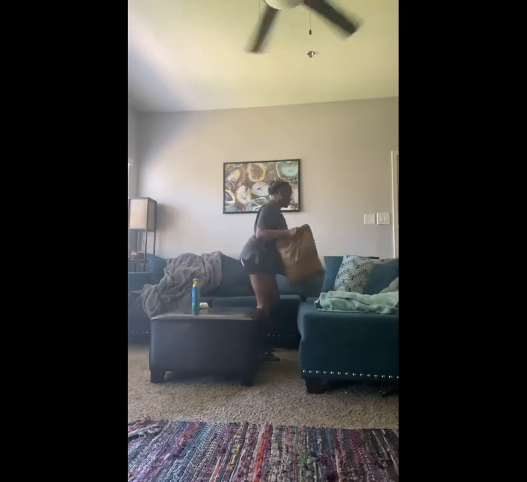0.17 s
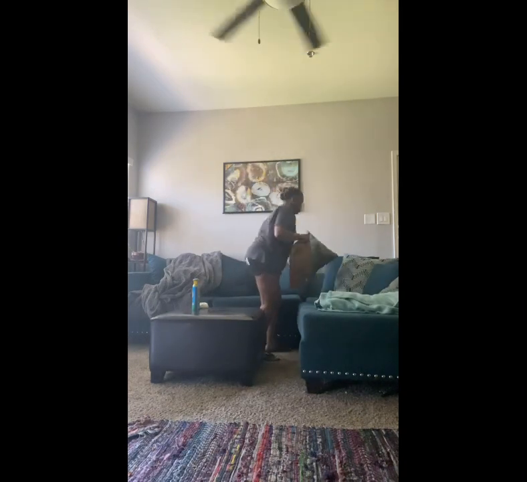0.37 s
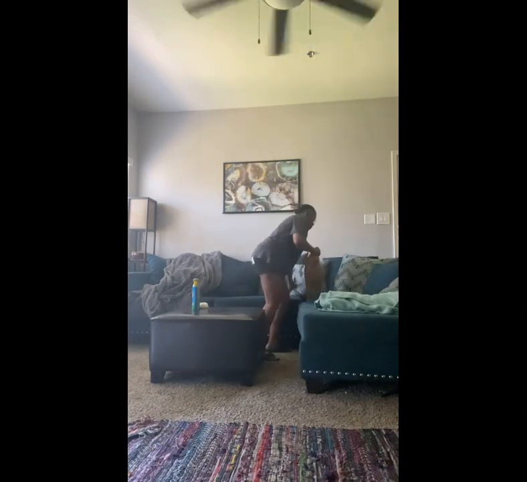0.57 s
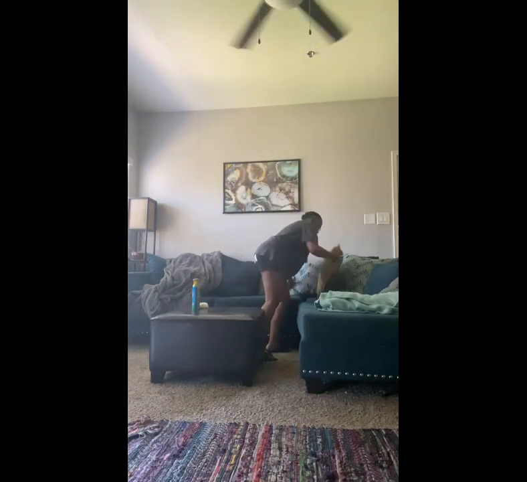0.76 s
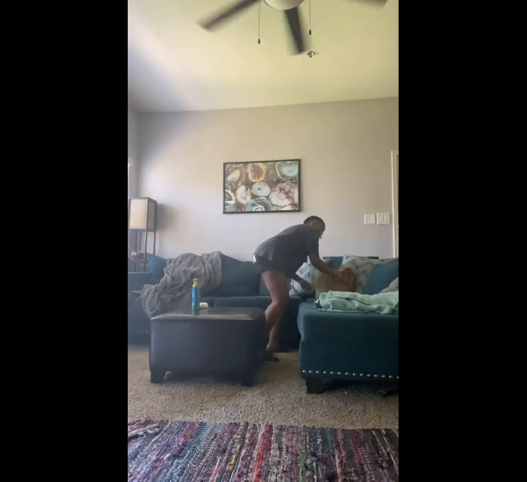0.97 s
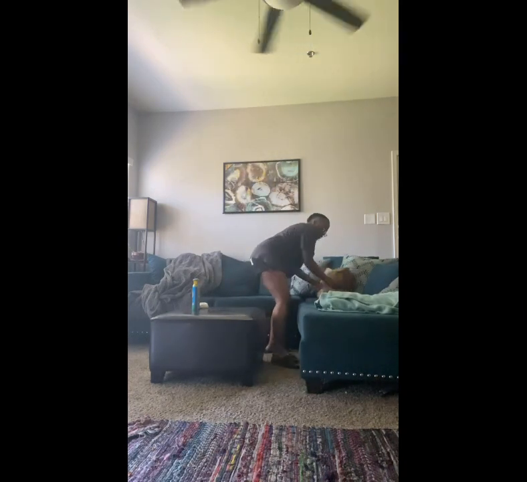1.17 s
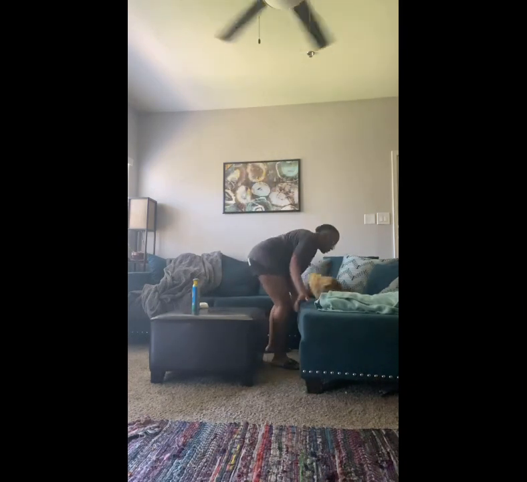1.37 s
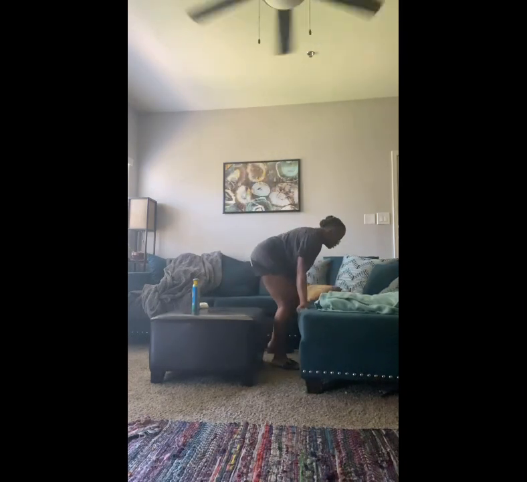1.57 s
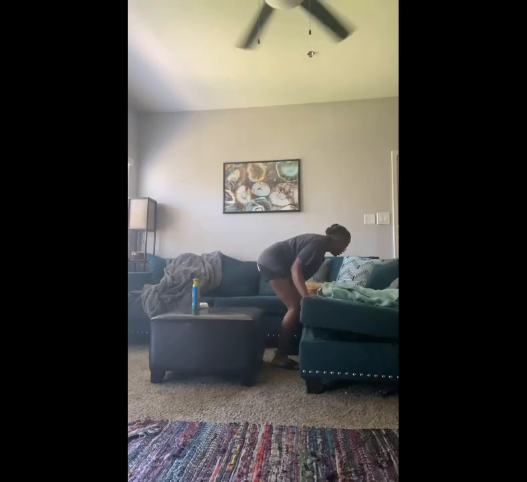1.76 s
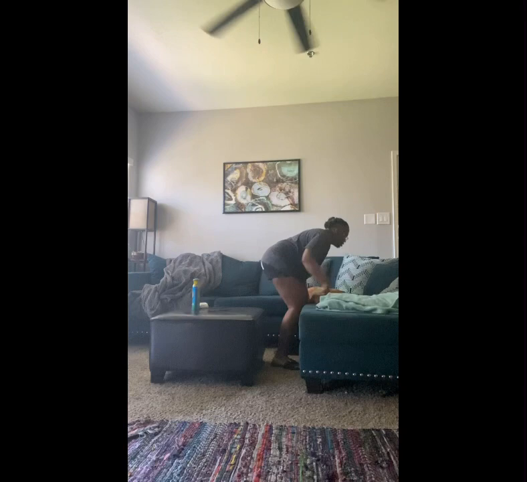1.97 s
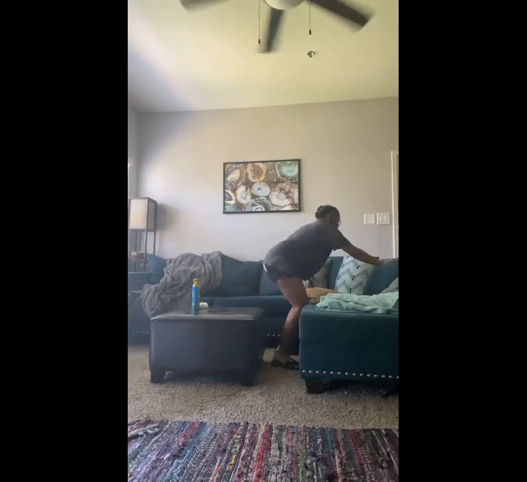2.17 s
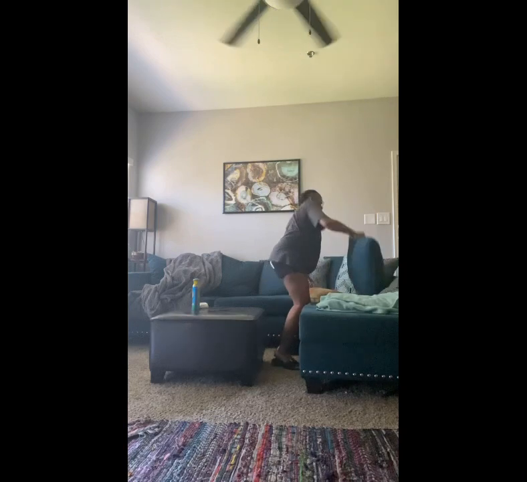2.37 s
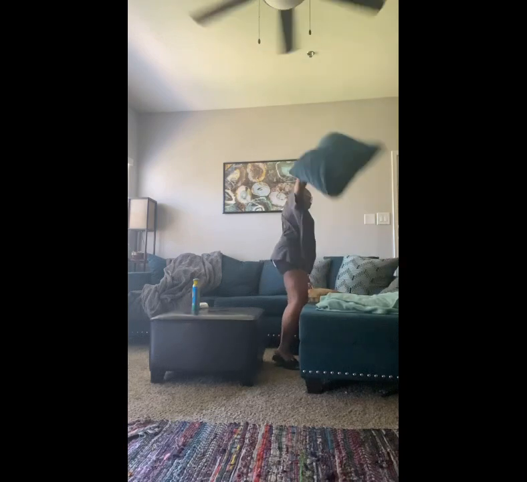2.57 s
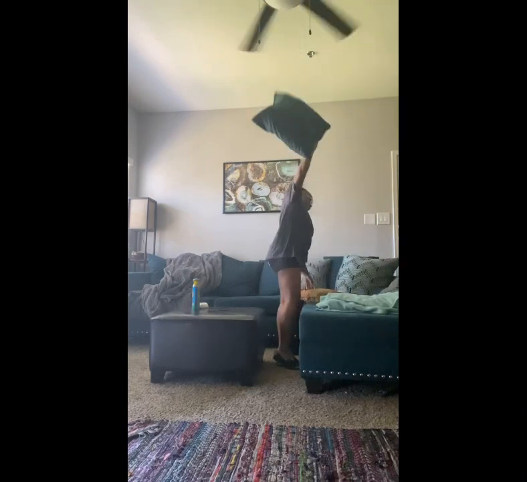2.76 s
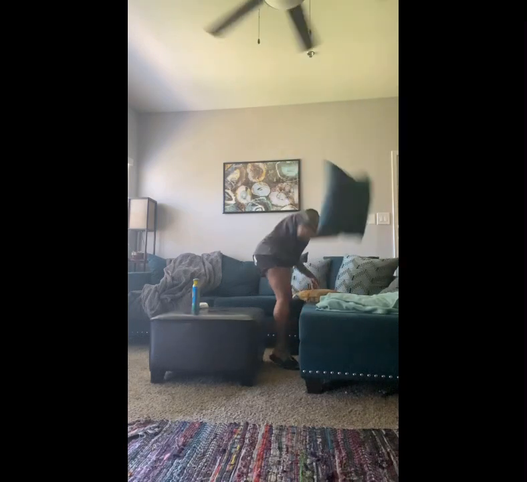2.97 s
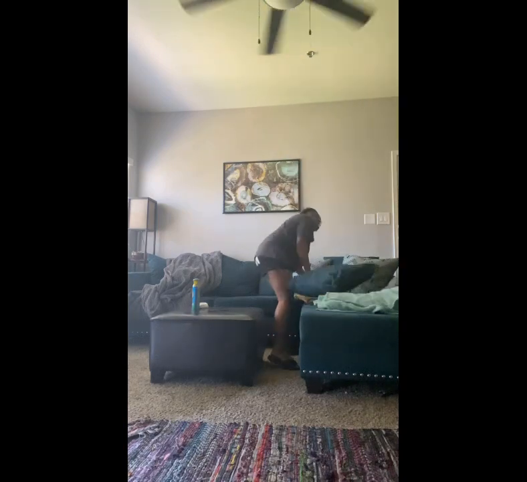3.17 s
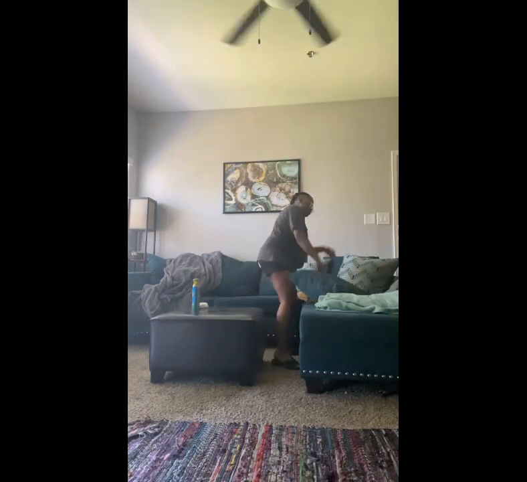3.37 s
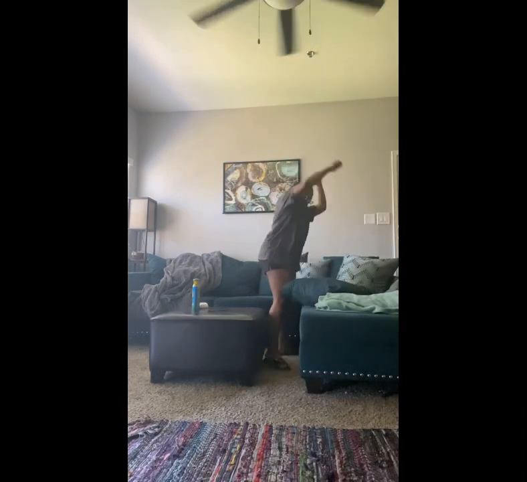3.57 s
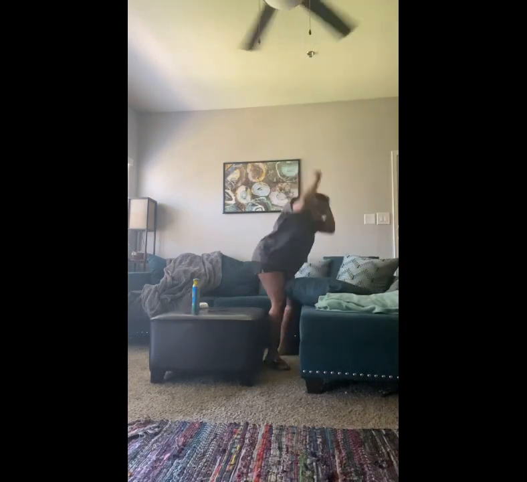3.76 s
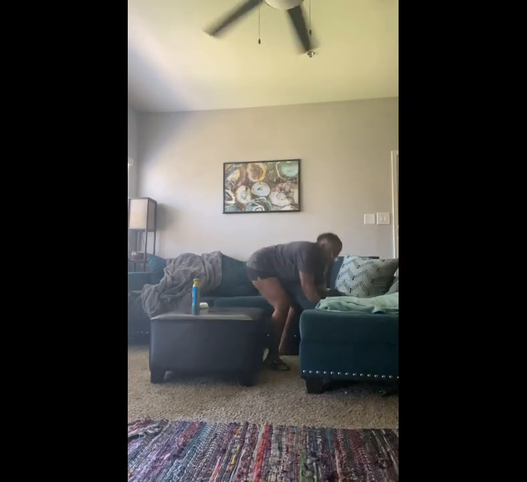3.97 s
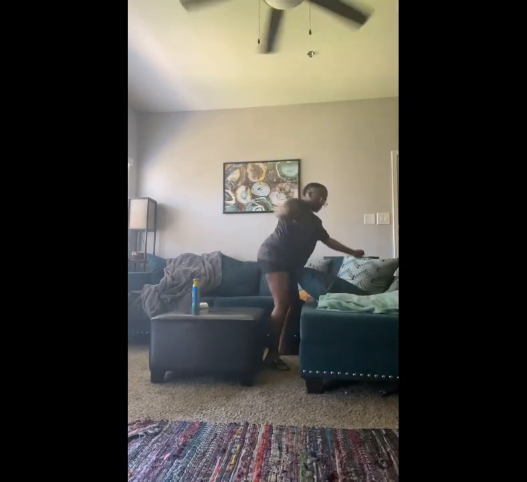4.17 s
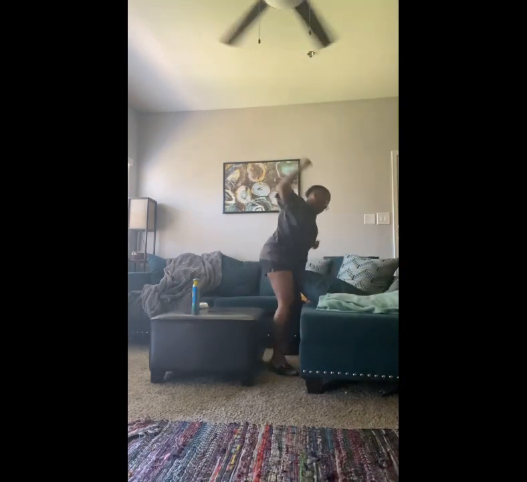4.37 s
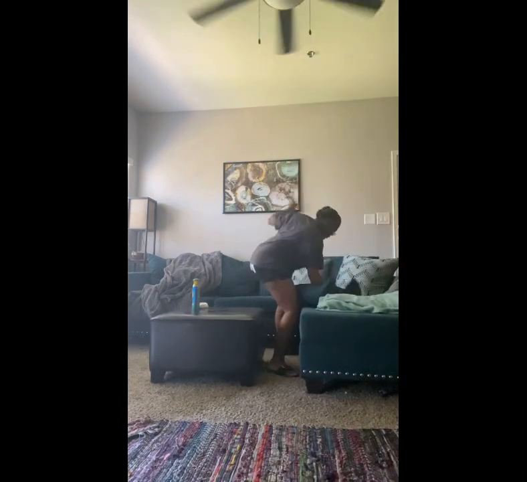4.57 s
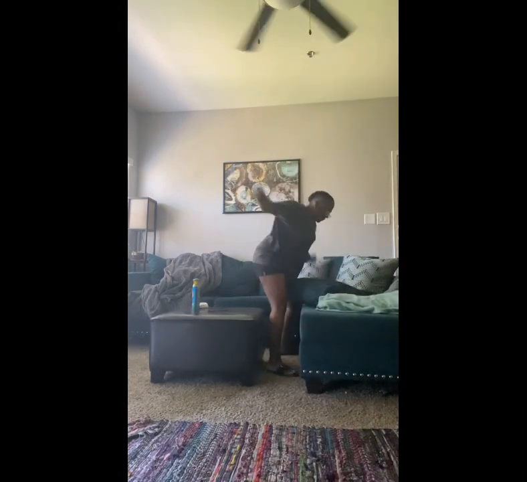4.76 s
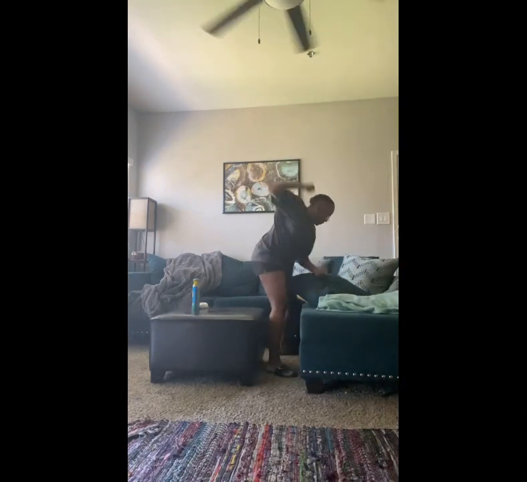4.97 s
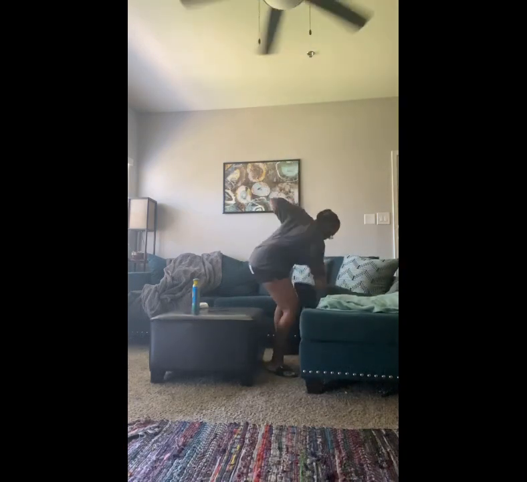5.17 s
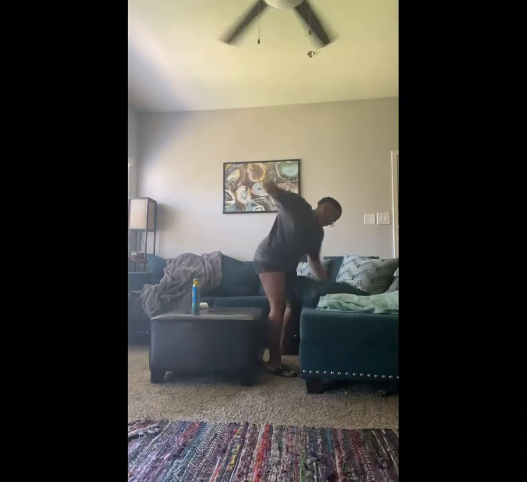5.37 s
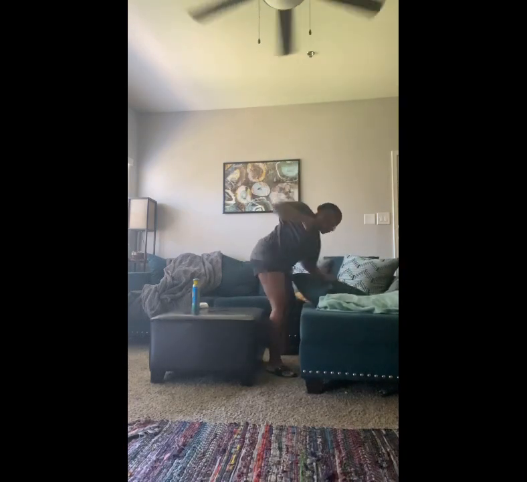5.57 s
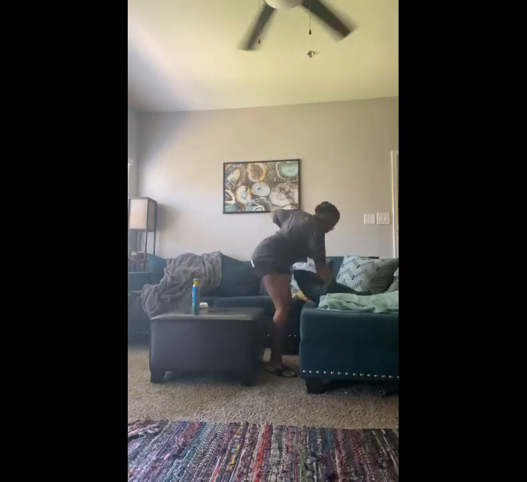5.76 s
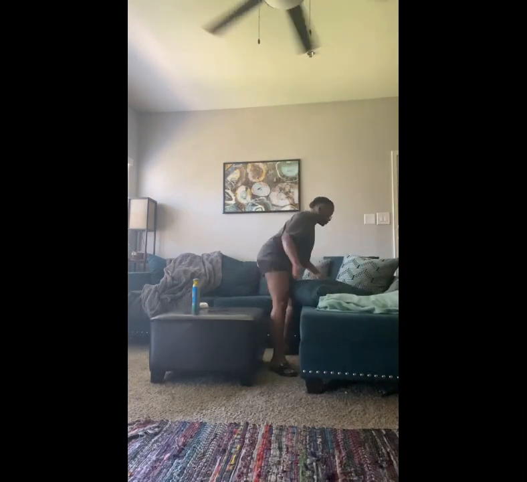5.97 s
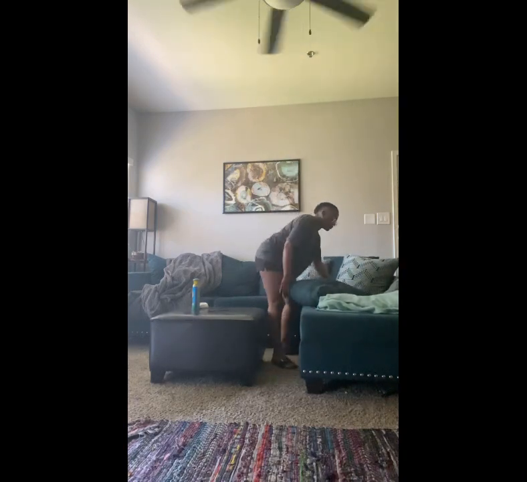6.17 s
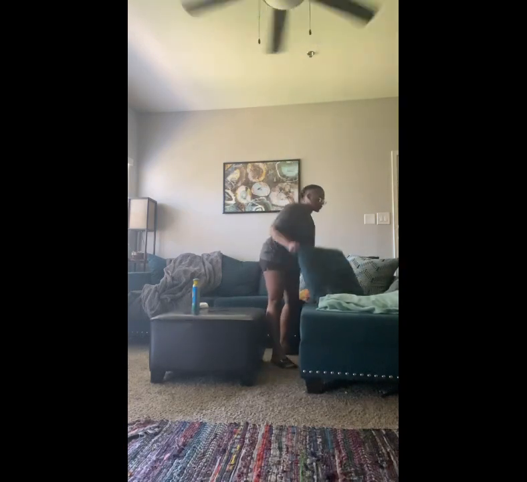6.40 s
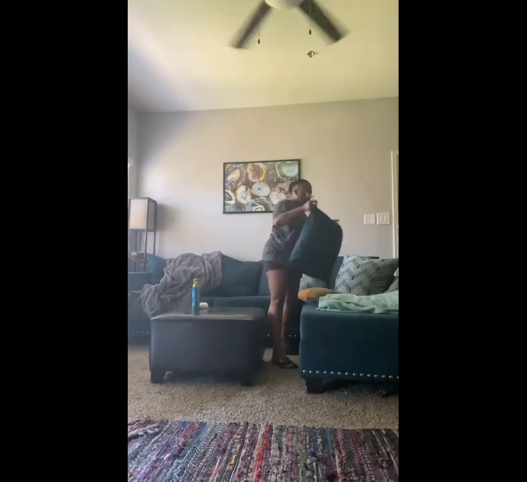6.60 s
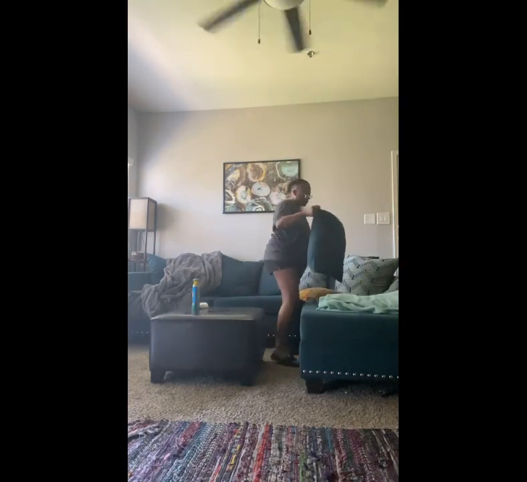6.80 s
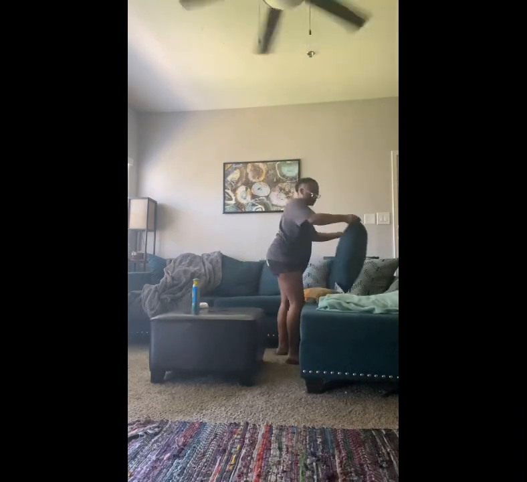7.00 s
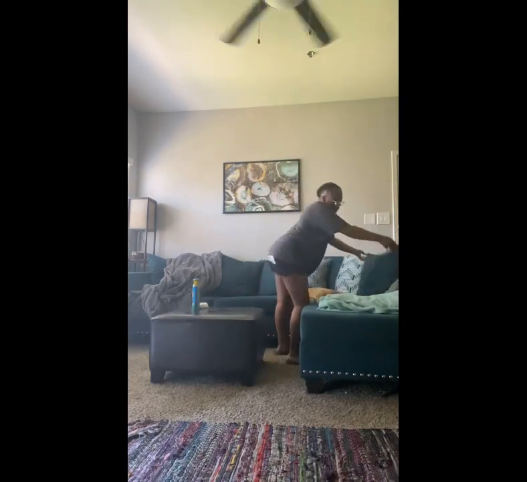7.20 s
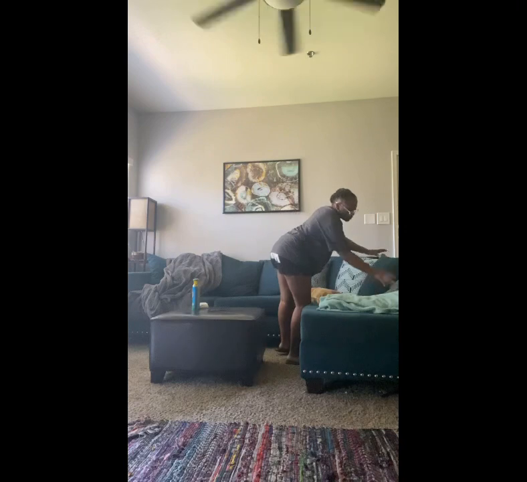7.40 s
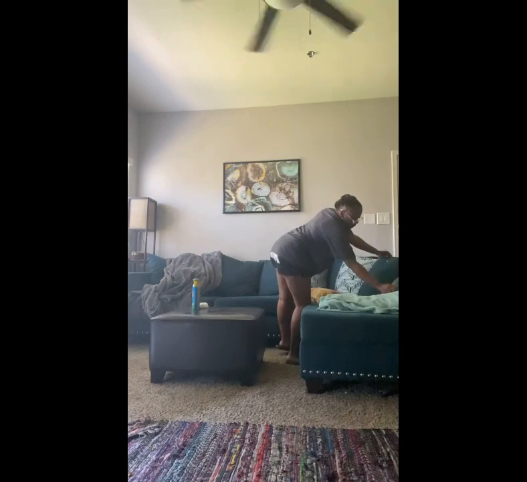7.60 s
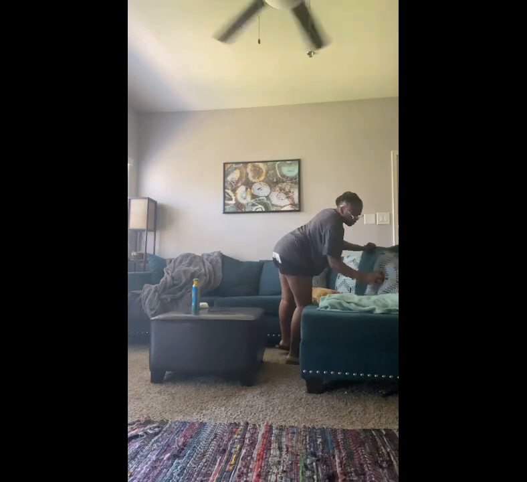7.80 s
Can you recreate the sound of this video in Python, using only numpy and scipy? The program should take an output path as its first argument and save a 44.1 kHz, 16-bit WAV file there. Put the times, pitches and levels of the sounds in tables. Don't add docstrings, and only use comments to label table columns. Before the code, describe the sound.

A carpeted living room heard close up in stereo, with soft room air and a very quiet low fan hum throughout. From 0 to 1.7 s cloth is shuffled, with light pats and short faint swishes. At 1.8 s a cushion drops flat and dull. From 2 to 4.2 s a tiny metal charm tinkles very high and thin, brightest around 2.8 to 3.0 s, amid crisp fabric brushing. The hardest punch lands at 3.0 s, a deep whump with a cloth slap and short room ring. Another hard one follows at 3.85, then 4.5, a softer one at 4.8, a sharp pair near 5.1, light at 5.35 and medium at 5.65. Rustling and a silky swish follow near 5.9, a soft drop at 6.55 with little pats and a faint floor thud, then gentle cloth handling until about 7.9 s.

```python
import sys
import numpy as np
from scipy import signal
from scipy.fft import rfft, irfft
from scipy.io import wavfile

SR = 44100
rng = np.random.default_rng(int(sys.argv[2]) if len(sys.argv) > 2 else 0)


def gain_from_db(level_db):
    decades = np.asarray(level_db, float) / 20
    return 10 ** decades


def waveform_to_disk(signal):
    frames = np.transpose(np.atleast_2d(signal))
    scaled = np.clip(frames, -1, 1) * 32767
    samples = np.round(scaled).astype(np.int16)
    wavfile.write(sys.argv[1], SR, samples)


N = 345744
TIME_S = np.arange(N) / SR


def at_hz(points, hz):
    curve_hz, value = np.transpose(points)
    return np.interp(np.log(hz), np.log(curve_hz), value)


def shares(centres_hz, hz):
    rank = np.argsort(centres_hz)
    log_centres = np.log(np.sort(centres_hz))
    return np.array([np.interp(np.log(hz), log_centres, rank == k) for k in range(len(rank))])


def drift(rate_hz):
    r = np.exp(-80 * np.pi * rate_hz / SR)
    slow = signal.lfilter([1], [1, -2 * r, r * r], rng.standard_normal(N // 40 + 2002))[2000:]
    return np.interp(np.arange(N) / 40, np.arange(len(slow)), slow / slow.std())


def clicks(times_s, sizes):
    index = np.round(np.asarray(times_s) * SR).astype(int)
    return np.bincount(index, sizes, N)[:N] + 1e-18


def fade(x, t60_s):
    return signal.lfilter([1], [1, -gain_from_db(-60 / (t60_s * SR))], x)


def ring(x, hz, t60_s):
    r, w = gain_from_db(-60 / (t60_s * SR)), 2 * np.pi * hz / SR
    return signal.lfilter([0, np.sin(w)], [1, -2 * r * np.cos(w), r * r], x)


def banded(envelope, mid, side, side_db, grain_db, pulse=lambda hz: 0):
    white = rng.standard_normal((2, 2, N)) * gain_from_db(grain_db * rng.standard_normal(N))
    white /= white.std()
    edges_hz = 32 * 2 ** (np.arange(28) / 3)
    total = np.sqrt(np.trapezoid(gain_from_db(2 * at_hz(mid, edges_hz)), edges_hz) * 2 / SR)
    out = np.zeros((2, N))
    for k, (low_hz, high_hz) in enumerate(zip(edges_hz, edges_hz[1:])):
        hz = np.sqrt(low_hz * high_hz)
        colour = gain_from_db(np.array([[at_hz(mid, hz)], [at_hz(side, hz) + side_db]])) / total
        band = signal.butter(2, [low_hz, high_hz], "band", fs=SR, output="sos")
        out += colour * signal.sosfilt(band, white[k % 2] * envelope(hz) + pulse(hz))
    return out


# centre_hz, width_hz
FAN_MODES = [(103, 12), (180, 3), (288, 6)]
FAN_RMS_DB = [-58, -63, -73]


def fan():
    out = np.zeros(N)
    for (hz, width_hz), rms_db in zip(FAN_MODES, FAN_RMS_DB):
        hum = ring(rng.standard_normal(N), hz, np.log(1000) / (np.pi * width_hz))
        out += gain_from_db(rms_db) * hum / hum.std()
    return out * [[1], [.03]]


# middle_s, half_length_s, strength_db (over room air), brightness_db
HANDLING = [(0.0, 0.19, 12.5, -2), (0.47, 0.15, 3.5, 7.5), (0.88, 0.53, 2.5, 1.5), (1.527, 0.31, 6.5, 4.5),
            (1.82, 0.31, 4.5, 6), (2.24, 0.21, 6, 1), (2.53, 0.54, 1.5, 4.5), (2.8, 0.18, 4, 4),
            (3.014, 0.095, 8, 8.5), (3.138, 0.13, 4, 6.5), (3.31, 0.24, 7, 6.5), (3.563, 0.23, 3, 6.5),
            (4.017, 0.15, 10.5, 5.5), (4.153, 0.16, 5.5, 2.5), (4.436, 0.15, 3.5, 6.5),
            (4.835, 0.47, 3.5, 4), (5.168, 0.18, 5, 11), (5.41, 0.14, 12, 1.5), (5.681, 0.21, 6, 7),
            (6.049, 0.34, 6, 5.5), (6.34, 0.29, 5, 1), (6.57, 0.3, 5.5, 5.5), (6.412, .05, 2.5, 10.5),
            (6.98, 0.17, 0.5, 4.5), (7.19, 0.13, 7, 2.5), (7.558, 0.18, 8.5, -0.5), (7.83, 0.24, 8, -0.5)]
# time_s, share
HISS_SHARE = [(0, .1), (1.4, 0.15), (1.55, 1.63), (3.7, 1.2), (6.65, 1.7), (6.9, .3), (7.84, 0.39)]
RESTING_DB = [3, 3, 4.5]


def handling():
    power = np.ones((2, N))
    for middle_s, half_s, strength_db, bright_db in HANDLING:
        arch = np.clip(1 - ((TIME_S - middle_s) / half_s) ** 2, 0, 1) ** 2
        peak_db = np.clip([[strength_db], [strength_db + bright_db]], 0, 40)
        power += (gain_from_db(2 * peak_db) - 1) * arch ** 2
    shuffle_db, brushing_db = 10 * np.log10(power)
    hiss_db = np.interp(TIME_S, *np.transpose(HISS_SHARE)) * brushing_db
    return np.array([shuffle_db, brushing_db, hiss_db]) + np.array(RESTING_DB)[:, None]


RUSTLE_HZ = [500, 3200, 11000]
# freq_hz, density_db_per_hz
AIR_MID = [(30, -6.5), (75, -6), (110, 3), (150, -35.5), (210, -21.5), (400, -18.5), (740, -26.5),
           (1900, -47.5), (3200, -44.5), (5200, -50), (7000, -50.5), (12000, -69), (16000, -68.5)]
# freq_hz, density_db_per_hz
AIR_SIDE = [(30, -22.5), (184, -5.5), (480, -3.5), (820, -7.5), (1130, -7.5), (2500, -18.5), (3200, -11),
            (5000, -18.5), (8000, -27.5), (12000, -36.5), (16000, -49.5)]


def rustle():
    air_db, side_db, crease_db = -59, -29.5, 1
    together = drift(1.4)
    rise_db = handling() * (1 + crease_db / 10 * drift(22))

    def envelope(hz):
        handled_db = np.clip(np.log2(hz / 110), 0, 1) * (shares(RUSTLE_HZ, hz) @ rise_db)
        patchy_db = (1.6 * together + 1.8 * drift(14)) * min(hz / 300, 1)
        return gain_from_db(air_db + handled_db + patchy_db)

    return banded(envelope, AIR_MID, AIR_SIDE, side_db, grain_db=1.5)


# start_s, length_s, first_pitch_hz, last_pitch_hz, level_db
SWISHES = [
    (0.261, 0.077, 2890, 2930, -60),
    (0.876, 0.1, 2890, 3400, -68),
    (1.874, 0.14, 3150, 3240, -61),
    (3.137, 0.16, 3100, 3500, -67),
    (3.273, 0.11, 3460, 3496, -57.5),
    (3.515, .13, 3110, 3000, -63),
    (4.0, 0.25, 3380, 3280, -66),
    (4.333, 0.16, 3310, 3510, -60),
    (5.913, 0.18, 3343, 3230, -58),
    (7.746, 0.17, 3170, 3230, -68),
]


def swish():
    edge_s = 0.047
    out = np.zeros(N)
    lowpass = signal.butter(2, 170, fs=SR, output="sos")
    narrow = signal.sosfilt(lowpass, rng.standard_normal((2, N)))
    narrow /= narrow.std()
    waver_hz, waver_db = 40.5 * drift(19), 3.5 * drift(3.3)
    for start_s, length_s, first_hz, last_hz, level_db in SWISHES:
        end_s = start_s + length_s
        stroke = np.clip(np.minimum(TIME_S - start_s, end_s - TIME_S) / edge_s, 0, 1)
        pitch_hz = np.interp(TIME_S, [start_s, end_s], [first_hz, last_hz]) + waver_hz
        phase = 2 * np.pi * np.cumsum(pitch_hz) / SR
        sung = narrow[0] * np.cos(phase) + narrow[1] * np.sin(phase)
        out += stroke * gain_from_db(level_db + waver_db - 9.5) * sung
    return out * [[1], [.3]]


# start_s, high_ring_db, low_ring_db
TINKLES = [(1.9796, -40.5, -60.5), (1.9961, -51, -79), (2.2425, -46, -68), (2.2954, -52, -70),
           (2.7075, -49.5, -77), (2.7329, -44.5, -61.5), (2.768, -31, -53), (2.7924, -51.5, -62),
           (2.8821, -44, -59.5), (2.91, -35, -54.5), (3.0243, -26.5, -49.5), (3.0732, -44, -64),
           (3.1874, -55, -70), (3.3376, -62, -60.5), (3.3966, -37, -56), (3.4773, -72, -72),
           (3.708, -54.5, -70.5), (3.7385, -52, -62.5), (3.7703, -71, -83), (3.8431, -48.5, -52.5),
           (3.866, -46.5, -66), (3.9294, -56, -62), (3.9746, -70, -91), (4.2004, -54.5, -68.5)]
# first_s, last_s
SWAY_S = (2.0, 4.2)
# high_ring_db, low_ring_db
SWAY_DB = (-68, -80.5)
CHARM_HZ = [15470, 15545, 15630, 15390, 12720, 5710, 6100, 5050]
# mode_db, t60_s, side_db
CHARM_MODES = [(-10, .15, -30), (-11, .13, -30), (-15, .1, -30), (-16, .1, -30), (-33, .1, -3), (-5, .1, 2),
               (-9, .06, 2), (2, .22, 0)]
# freq_hz, density_db_per_hz
RATTLE_MID = [(3000, -29.5), (5500, -0.5), (8000, 6), (12000, -3), (16000, -0.5)]
# freq_hz, density_db_per_hz
RATTLE_SIDE = [(3000, -19.5), (5500, 0.5), (9000, -1), (12000, -6), (16000, -7)]


def charm():
    sway = rng.random((40, 2))
    sway_place = (np.arange(len(sway)) + sway[:, 0]) / len(sway)
    sway_s = np.interp(sway_place, [0, 1], SWAY_S)
    faint = np.c_[sway_s, np.add(SWAY_DB, 12.0 * (sway[:, 1:] - .5))]
    start_s, high_db, low_db = np.vstack([TINKLES, faint]).T
    rattle_db = -10 + 0.55 * high_db + 0.48 * low_db

    luck = rng.random((len(start_s), 80))
    touch_s = start_s[:, None] + .025 * luck[:, :4] ** 2 * [0, 1, 1, 1]
    walls = rng.standard_normal((2, 9000)) * gain_from_db(-28.0 - 60 * np.arange(9000) / (.16 * SR))
    walls[:, 0] = 1
    rings = np.zeros((2, N))
    for k, (hz, (mode_db, t60_s, side_db)) in enumerate(zip(CHARM_HZ, CHARM_MODES)):
        ring_db = high_db + 0.6 if hz > 8000 else low_db - 3.0
        for ch in range(2):
            first = 4 + 8 * k + 4 * ch
            draw = luck[:, first:first + 4]
            strike = np.sign(draw - .5) * (0.26 + .7 * np.abs(2 * draw - 1))
            sizes = gain_from_db(ring_db[:, None] + mode_db + ch * side_db) * strike
            rings[ch] += ring(clicks(touch_s.ravel(), sizes.ravel()), hz, t60_s)

    links = fade(clicks(start_s, gain_from_db(rattle_db)), 0.38)
    rattle = banded(lambda hz: links, RATTLE_MID, RATTLE_SIDE, side_db=3.0, grain_db=5.0)
    return signal.fftconvolve(rings, walls, axes=1)[:, :N] + rattle


# start_s, body_peak_db, thump_db, knock_db, slap_db
BLOWS = [
    (1.802, -20.5, -39.5, -41.5, -90),
    (3.007, -12.5, -16, -10.5, -13),
    (3.852, -12.5, -30.5, -16.5, -17.5),
    (4.475, -15, -28, -17, -18.5),
    (4.768, -22.5, -38, -36.5, -37),
    (5.065, -16, -41.5, -24, -29),
    (5.129, -84, -47, -41, -29),
    (5.338, -29, -32, -30, -33.5),
    (5.633, -21.5, -34, -22, -27),
    (6.559, -28.5, -42, -30, -44),
]
# start_s, body_peak_db, knock_db, slap_db
PATS = [(0.019, -55, -44.5, -48.5), (0.28, -53, -52, -47), (0.485, -41, -52.5, -87),
        (0.511, -53, -52.5, -56.5), (1.049, -62, -53, -76), (1.47, -45, -54.5, -54),
        (1.516, -50.5, -46.5, -92), (1.772, -61, -51, -42.5), (2.12, -46.5, -56, -55),
        (2.306, -54, -52, -55.5), (3.253, -41.5, -52, -56.5), (4.252, -45.5, -66, -52.5),
        (5.489, -53, -52.5, -46), (5.719, -64, -77, -58.5), (5.969, -62, -39, -49), (6.429, -60, -66, -60),
        (6.497, -51, -56, -57.5), (6.644, -37.5, -49, -88), (6.698, -37.5, -42.5, -56),
        (7.22, -34.5, -54.5, -76), (7.545, -63.5, -43.5, -52)]
# start_s, thump_db
STEPS = [
    (0.53, -51),
    (1.73, -44.5),
    (2.759, -49.5),
    (3.278, -46),
    (3.5, -49),
    (6.66, -45),
    (4.24, -48.5),
]


def contacts():
    pat_thump_db = -57
    pat_dull_db, silent_db = -25.5, -95
    hard, soft, steps = [], [], []
    for start_s, body, thump, knock, slap in BLOWS:
        crisp = -42 + 0.49 * slap + 0.74 * max(slap - knock, -8.0)
        hard.append((start_s, body, thump, knock, slap, crisp))
    for start_s, body, knock, slap in PATS:
        crisp = -42 + pat_dull_db + 0.49 * slap
        soft.append((start_s, body, pat_thump_db, knock, slap, crisp))
    for start_s, thump in STEPS:
        steps.append((start_s, thump - 14.0, thump, silent_db + 21.5, silent_db, 2 * silent_db))
    return np.array(sorted(hard + soft) + steps)


COLOUR_HZ = [250, 80, 750, 2300, 12000]
# freq_hz, density_db_per_hz
BLOW_MID = [(30, -25), (65, 2.5), (150, -5), (210, -3.5), (330, -4), (530, -7), (1000, -17), (2100, -29),
            (3200, -30), (5000, -38), (7000, -41), (12000, -72.5), (16000, -54)]
# freq_hz, density_db_per_hz
BLOW_SIDE = [(30, -41.5), (140, -34), (250, -10.5), (500, -6), (900, -6.5), (1400, -6), (3000, -12),
             (6000, -20.5), (11000, -42.5), (16000, -42.5)]
# freq_hz, t60_s
TAIL = [(50, .34), (120, .3), (300, .33), (700, .27), (2000, .22), (4000, .21), (12000, .2)]
# freq_hz, level_db, t60_s
ROOM_MODES = [(56, -34, 0.11), (76.1, -13, 0.15), (104.2, -15.5, 0.32), (150, -38.5, 0.087),
              (204.8, -14.5, 0.12), (250.2, -17, 0.14), (364.3, -26, 0.11), (528, -23, 0.19),
              (657, -30, 0.2), (735.3, -25.5, 0.073), (856, -25.5, 0.055), (1072, -26.5, 0.028),
              (1340, -38, 0.14)]


def blows():
    blow_db, side_db, flat_db = -26.5, -18.5, 20
    rows = contacts()
    start_s = rows[:, 0]
    body_db, thump_db, knock_db, slap_db, top_db = rows[:, 1:].T
    colour_db = rows[:, 1:] - np.array([-14.5, -23, -20.5, -20.0, -60.5])
    luck = rng.standard_normal((len(start_s), 30))
    gentle = (body_db < -38) * np.clip((knock_db - slap_db) / 10, 0, 1)
    flat = (body_db > -38) * (knock_db - slap_db > 30)
    spread_s = .013 + 0.02 * gentle - .01 * flat
    landing_s = start_s[:, None] - .002 + spread_s[:, None] * np.linspace(0, 1, 5)
    uneven = gain_from_db(3.0 * luck[:, :5]) / 3

    def envelope(hz):
        size = gain_from_db(colour_db @ shares(COLOUR_HZ, hz) + blow_db)
        lead_db = np.clip(2.5 * np.log2(hz / 150), 0, 9) * (1 - gentle[:, None]) * np.linspace(1, -1, 5)
        struck = clicks(landing_s.ravel(), (size[:, None] * uneven * gain_from_db(lead_db)).ravel())
        return gain_from_db(12.0) * fade(struck, 0.016) + fade(struck, at_hz(TAIL, hz))

    def wavefront(hz):
        push_db = flat_db * flat / (1 + (hz / 700) ** 2)
        level_db = colour_db @ shares(COLOUR_HZ, hz) + blow_db + 21 - 5.7 * np.log2(hz / 300)
        return clicks(landing_s[:, 0] + 0.00267 * flat, (1 - gentle) * gain_from_db(push_db + level_db))

    out = banded(envelope, BLOW_MID, BLOW_SIDE, side_db, grain_db=4.0, pulse=wavefront)
    for k, (hz, mode_db, t60_s) in enumerate(ROOM_MODES):
        push_db = colour_db @ shares(COLOUR_HZ, hz) + mode_db + 3.5 * luck[:, 5 + k] - 2.0 * flat
        push = clicks(start_s + .002 + 0.74 * (1 - flat) / hz, gain_from_db(push_db))
        soft = signal.sosfilt(signal.butter(2, 1.6 * hz, fs=SR, output="sos"), push)
        out[0] += ring(soft, hz, t60_s)
    return out


def scene():
    return blows() + rustle() + swish() + fan() + charm()


def top_cut(x):
    return signal.sosfilt(signal.butter(12, 16800, fs=SR, output="sos"), x)


def record(dry):
    port_hz, port_width_hz, port_lag_s, port_peak_db = 3050, 800, 4.8e-5, 13
    r, w = np.exp(-np.pi * 520 / SR), 2 * np.pi * port_hz / SR
    gain = (1 - r * r) / 2
    peak = signal.lfilter([gain, 0, -gain], [1, -2 * r * np.cos(w), r * r], dry)
    highpass = signal.butter(5, 54, "high", fs=SR, output="sos")
    mid, side = rfft(signal.sosfilt(highpass, dry + gain_from_db(port_peak_db) * peak))
    hz = np.fft.rfftfreq(N, 1 / SR)
    tied = .9 * np.exp(-((hz - port_hz) / port_width_hz) ** 4)
    follow = .62 * mid * np.exp(-2j * np.pi * hz * port_lag_s)
    side = np.sqrt(tied) * follow + np.sqrt(1 - tied) * side - .04 * mid
    side = side / (1 + (hz / 13100) ** 40)
    notch_db = -13 * np.exp(-((hz - 8300) / 1600) ** 2)
    mid = mid * gain_from_db(notch_db) / (1 + (hz / 15900) ** 80)
    return top_cut(irfft(np.array([mid + side, mid - side]), N))


dry = scene()
out = record(dry)
waveform_to_disk(out)
```